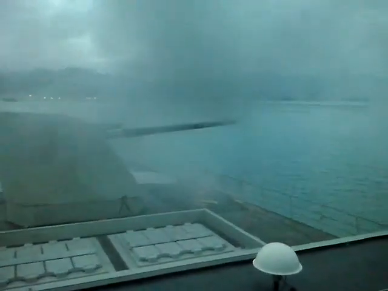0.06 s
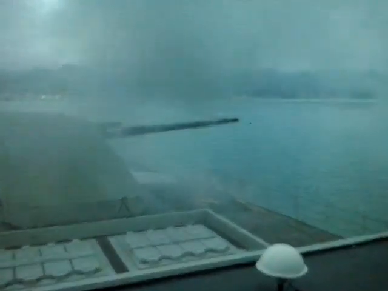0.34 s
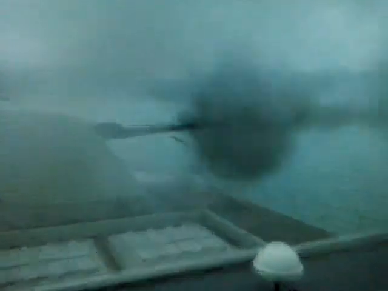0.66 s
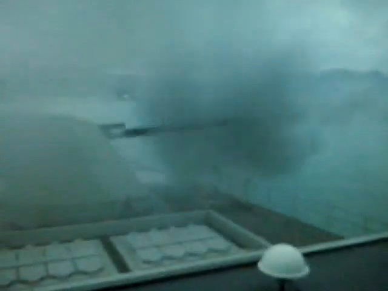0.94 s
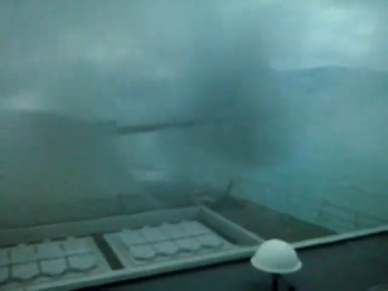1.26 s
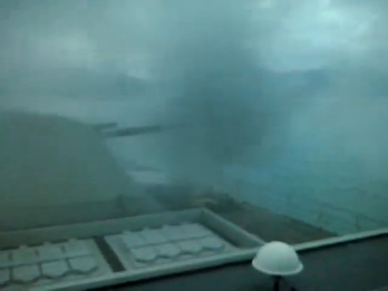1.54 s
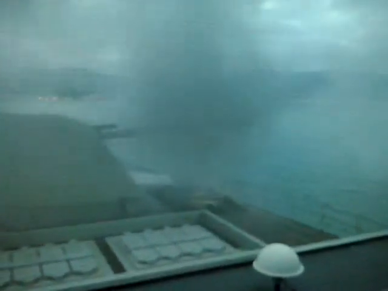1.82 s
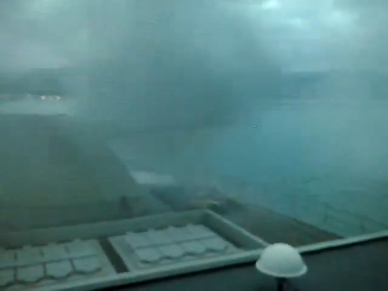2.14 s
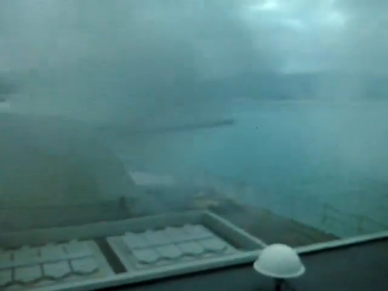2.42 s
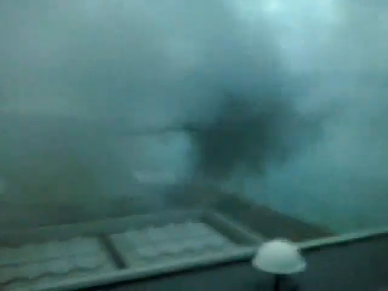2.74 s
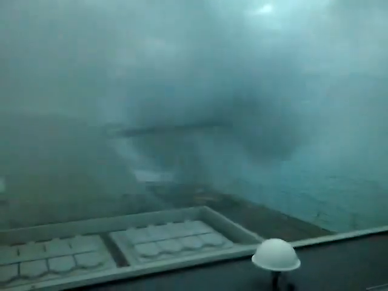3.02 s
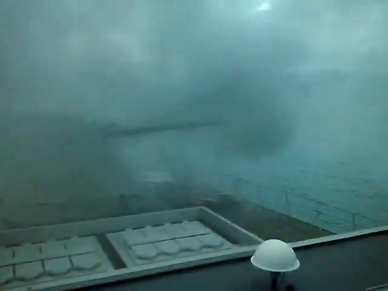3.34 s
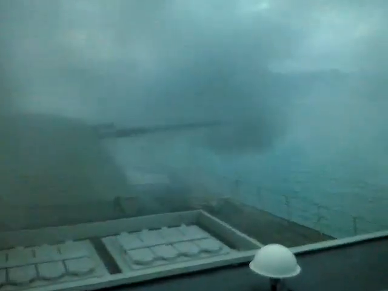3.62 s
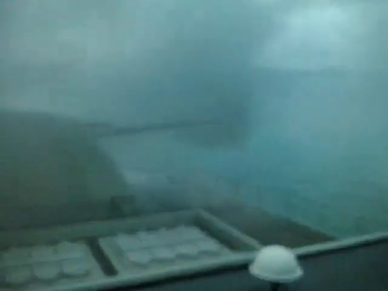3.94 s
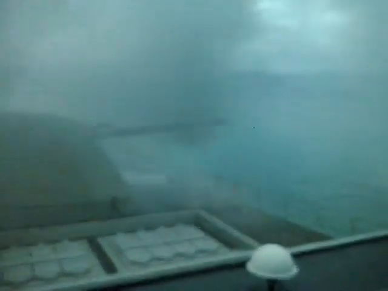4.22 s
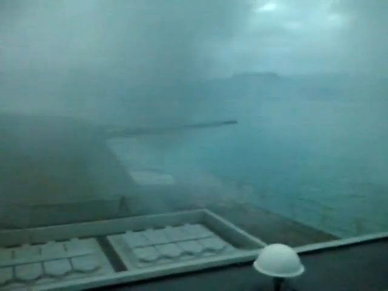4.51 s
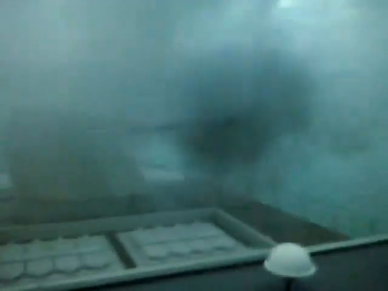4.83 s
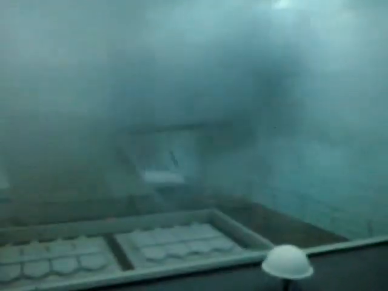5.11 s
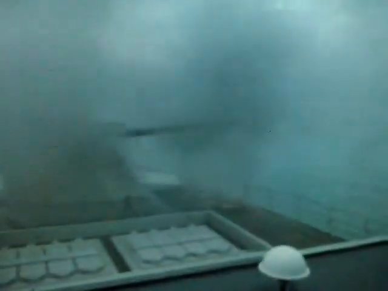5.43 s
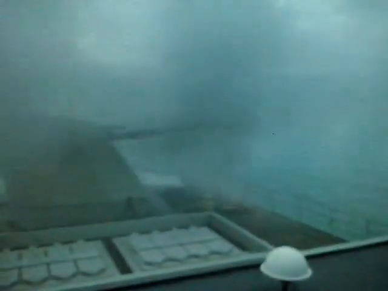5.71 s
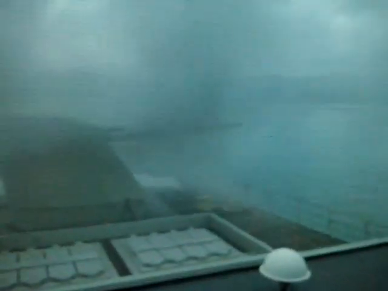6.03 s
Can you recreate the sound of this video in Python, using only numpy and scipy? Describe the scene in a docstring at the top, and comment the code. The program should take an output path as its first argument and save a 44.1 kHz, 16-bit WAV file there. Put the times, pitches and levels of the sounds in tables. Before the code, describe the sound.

A naval deck gun fires three booming, distorted shots over ship rumble, wind and sea, with spent cases clanking on steel.

```python
"""A naval deck gun fires three rounds, two seconds apart, over ship rumble and the hiss of wind and sea.
Each blast overloads the microphone: first a hard slam, then sputtering cracks as the air pressure swings
from one limit to the other. A boom and a roar then roll away over the water. Spent cases clank on the
steel deck, machinery whines, and the background swells with each stroke of the gun's gear."""
import sys
import numpy as np
from scipy import signal
from scipy.fft import rfft, irfft, next_fast_len
from scipy.io import wavfile

SR = 44100
rng = np.random.default_rng(int(sys.argv[2]) if len(sys.argv) > 2 else 0)


def persist_wave(psi):
    """Save psi, clipped to +-1, as 16-bit WAV."""
    counts = np.round(np.clip(psi, -1, 1) * 32767).astype(np.int16)
    wavfile.write(sys.argv[1], SR, np.atleast_2d(counts).T)


N = 276110
TIME = np.arange(N) / SR

# The gun's rounds. Each row: arrival of the blast in seconds, level of its boom and roar in dB.
ROUNDS = [(0.876, 0), (2.888, 0), (4.874, 0.5)]
# The tone colour of each noise. Each row: frequency in Hz, relative level in dB.
RUMBLE_COLOUR = [(20, -25), (35, -22), (55, -8.5), (80, -1.5), (110, -3.5), (145, -4.5), (190, -12.5),
                 (250, -18.5), (320, -33), (600, -49), (1500, -70.5)]
WASH_COLOUR = [(150, -13), (330, -0.5), (450, -1.5), (560, 2), (850, -7), (1150, -5), (1600, -5),
               (2300, -9.5), (3200, -11.5), (4500, -28.5), (7500, -39)]
HISS_COLOUR = [(1000, -22.5), (2500, -8.5), (4000, 2.5), (5200, 0.5), (6500, 1), (7500, -1.5)]
BOOM_COLOUR = [(25, -40.5), (50, -5), (80, 0), (120, 8.5), (170, -2.5), (250, -12.5), (400, -24),
               (800, -48.5)]
ROAR_COLOUR = [(100, -28.5), (300, -5), (600, 0.5), (1000, -3.5), (1550, 3.5), (2300, -4), (4000, -4),
               (6000, -4.5), (7500, -7.5)]
SLAM_COLOUR = [(20, 1.5), (60, -0.5), (130, 3), (250, -3.5), (350, -6), (480, -17), (1200, -23.5),
               (3000, -40), (7500, -69)]
SPUTTER_COLOUR = [(70, 10), (150, 10.5), (330, 10.5), (480, 2.5), (900, -5.5), (1500, 4.5), (2300, -4),
                  (4200, -3.5), (6000, -4.5), (7500, -5)]
HEAVE_COLOUR = [(15, -28), (24, -6.5), (31, -4), (39, -7), (60, -8.5)]
# Ship, wind and sea while the gun is still: the levels of rumble, wash and hiss in dB.
BACKGROUND_DB = (-28, -44, -55.5)
# Strokes of the loading and aiming gear.
# Each row: start in seconds, length in seconds, then the levels of rumble, wash and hiss in dB.
GEAR_STROKES = [ (0.0, 0.17, -20, -37, -44.5), (1.371, 0.32, -24, -37, -46),
                (1.837, 0.074, -23.5, -40, -47.5), (2.11, .1, -24.5, -42.5, -50),
                (2.617, 0.1, -22.5, -42.5, -52), (3.375, 0.38, -26, -44, -49.5),
                (3.793, 0.1, -23.5, -41, -47), (3.979, .12, -16, -35.5, -43.5),
                (4.676, 0.11, -24.5, -44.5, -49), (5.36, .45, -23.5, -43, -49.5),
                (5.98, 0.14, -24, -44.5, -50.5)]
# Tones of the ship's machinery and the gun drive. Each row: pitch in Hz, level in dB.
MACHINE_TONES = [(140, -34.5), (446.8, -56), (565.2, -48), (1077, -58.5), (1244, -61), (1637, -56.5)]
# Spent cases and loading gear hitting steel. Each row: start in seconds, level in dB.
STEEL_HITS = [(0.839, -30.5), (1.512, -33.5), (1.588, -32), (3.444, -37), (3.507, -38.5), (3.992, -39.5),
              (5.432, -37.5), (5.494, -35.5), (5.565, -41.5), (5.79, -40)]
# The notes steel rings with. Each row: pitch in Hz, relative level in dB, seconds to fade by 60 dB.
STEEL_NOTES = [(497, -6, .12), (655, 5, 0.058), (780, 6.5, 0.36), (1054, 12, 0.22), (1290, -6, .12),
               (1530, 11, 0.45), (1450, 17.5, 0.15), (1720, -24, .15), (2130, 0, 0.23), (3250, -19, .12),
               (3880, -12.5, .12), (5720, -31, .1)]
# The last pressure swings, which briefly overload the microphone again.
# Each row: delay in seconds after it first comes free, length in seconds.
LATE_SWINGS = [(0.03, 0.011), (0.051, 0.01), (.066, .003)]

# Seconds after a blast arrives: the slam ends, the swings start, the microphone comes free.
# "Pinned" means pushed to its limit, so that it cannot follow other sounds.
SLAM_S, FIRST_SWING_S, PINNED_S = .07, .0855, .298


def amp(db):
    """Turns decibels into a number to multiply a sound by."""
    return 10 ** (np.asarray(db) / 20)


def unit(x):
    """Scales a signal to an average strength (rms) of 1."""
    return x / np.sqrt(np.mean(x ** 2) + 1e-20)


def noise(colour):
    """Noise of strength 1 with the given tone colour."""
    hz, db = np.transpose(colour)
    size = next_fast_len(N)
    bins = np.fft.rfftfreq(size, 1 / SR) + 1
    shape = amp(np.interp(np.log(bins), np.log(hz), db, left=-np.inf, right=-np.inf))
    return unit(irfft(rfft(rng.standard_normal(size)) * shape, size)[:N])


def drift(per_s):
    """A wandering curve of strength 1 that heads for a new random value per_s times a second."""
    points = rng.standard_normal(4096)
    return unit(np.interp(TIME * per_s, np.arange(len(points)), points))


def ramp(start, length):
    """Rises from 0 to 1 over the given length in seconds."""
    return np.clip((TIME - start) / length, 0, 1)


def low_pass(x, hz):
    """Steeply cuts the treble above hz."""
    return signal.oaconvolve(x, signal.firwin(161, hz, window=("kaiser", 7), fs=SR), "same")


def ship_and_sea(rise_s=0.021, fall_db_per_s=42.5, lumps_db=2, flicker_db=0.76, spurts_db=2):
    """Lumpy rumble, wash and hiss of ship, wind and sea; all swell with each stroke of the gun's gear."""
    gear = np.zeros((3, N))
    for start, length, *levels in GEAR_STROKES:
        swell = ramp(start, rise_s) * amp(-fall_db_per_s * np.maximum(TIME - start - length, 0))
        gear = np.hypot(gear, amp(levels)[:, None] * swell)  # hypot adds the powers of two noises
    gear[2] *= amp(spurts_db * drift(24))  # the gear's hiss comes in spurts
    rumble, wash, hiss = np.hypot(gear, amp(BACKGROUND_DB)[:, None])
    low = rumble * amp(lumps_db * drift(9.4)) * noise(RUMBLE_COLOUR)
    flicker = amp(flicker_db * drift(40))
    return low + flicker * (wash * noise(WASH_COLOUR) + hiss * noise(HISS_COLOUR))


def machinery(waver=0.01068, throb_db=2):
    """The ship's machines and the gun drive hum and whine, wavering a little in pitch and strength."""
    out = np.zeros(N)
    for hz, db in MACHINE_TONES:
        turns = np.cumsum(hz * (1 + waver * drift(45))) / SR
        throb = amp(throb_db * drift(16))
        out += amp(db) * unit(throb * np.sin(2 * np.pi * turns))
    return out


def boom_and_roar(hull_db_per_s=800, boom_hold_s=0.41, boom_db_per_s=172.5, roar_db_per_s=128):
    """Each shot comes through the hull just ahead of its blast, then rolls away over the water."""
    boom, roar = np.zeros((2, N))
    for arrives, db in ROUNDS:
        since = TIME - arrives
        hull_db = hull_db_per_s * since
        boom_fall_db = boom_db_per_s * np.maximum(since - boom_hold_s, 0)
        roar_fall_db = roar_db_per_s * np.maximum(since - PINNED_S, 0)
        boom += amp(db + np.where(since < 0, hull_db - 1.5, -10 - boom_fall_db))
        roar += amp(db + np.where(since < 0, hull_db - 23.5, -14.5 - roar_fall_db))
    roar *= noise(ROAR_COLOUR) * amp(drift(130))  # flutters by about 1 dB
    for arrives, _ in ROUNDS:
        for delay, length in LATE_SWINGS:
            from_swing = TIME - arrives - PINNED_S - delay
            roar *= 1 - np.exp(-(2 * from_swing / length) ** 4)  # chops a short gap
    return boom * noise(BOOM_COLOUR) + roar


def clanks(rattle_fade_s=0.13, ring_db=2):
    """Cases and gear hit steel: a short rattle, and a ring with a new mix of notes each time."""
    hz, note_db, fade_s = np.transpose(STEEL_NOTES)[:, :, None]
    out, rattle = np.zeros(N), noise(ROAR_COLOUR)
    for start, db in STEEL_HITS:
        first = round(start * SR)
        at = np.arange(first, min(first + SR // 2, N))
        t = TIME[:len(at)]
        strength, detune = rng.standard_normal((len(hz), 2)).T[:, :, None]
        waves = np.sin(2 * np.pi * hz * (1 + .01 * detune) * t)
        notes = amp(note_db - 60 * t / fade_s) * strength * waves
        ring = notes.sum(0) / np.linalg.norm(amp(note_db))
        out[at] += amp(db) * (amp(ring_db) * ring + amp(-60 * t / rattle_fade_s) * rattle[at])
    return out


def shock_cracks(count=9, front_s=0.00404, front_db=-5.5, half_length_s=0.0012):
    """The shock front cracks first, then the slam tears at uneven moments."""
    place, louder = rng.uniform(-0.993, 1, (count, 2)).T
    tear_s = front_s + (FIRST_SWING_S - front_s) * (np.arange(1, count + 1) + place / 2) / (count + 1)
    tear_db = -12 + 4 * louder
    half_lengths = np.full(count + 1, half_length_s)
    return np.column_stack([np.r_[front_s, tear_s], half_lengths, np.r_[front_db, tear_db]])


def swing_cracks(count=13, gap_s=.0141, slowing_s=.00036, jitter_s=0.00062, rebound_chance=.2):
    """The pressure swings to and fro, ever slower, and cracks as it crosses the microphone's range."""
    step = np.arange(2 * count - 1) / 2
    main = step % 1 == 0  # the half steps in between are possible rebounds
    late, longer, louder = rng.standard_normal((len(step), 3)).T
    luck, skew = rng.random((len(step), 2)).T
    step += ~main * (skew - .5) / 2
    delay = FIRST_SWING_S + gap_s * step + slowing_s * step ** 2 / 2
    crest = np.exp(-((delay - 0.218) / 0.026) ** 2)  # cracks are longer and louder near 0.218 s
    half_length = .0019 * (1 + 1.36 * crest) * np.exp(0.22 * longer)
    db = np.where(main, -12.5, -13) + 4.5 * crest + 3 * louder
    # Rebounds come by chance at first, then every time for a short spell, then stop.
    rebounds = (delay < .207) & ((delay > .174) | (luck < rebound_chance))
    return np.column_stack([delay + jitter_s * late, half_length, db])[main | rebounds]


def bass_cut(x, corner_hz=74):
    """The microphone's steep bass cut turns every jump in pressure into a short, falling thud."""
    return signal.sosfilt(signal.butter(6, corner_hz, "high", fs=SR, output="sos"), x)


def blasts(limit_db=1.5, punch_db=9, crack_db=4, heave_db=-5.5, fray_db=-29, fray_s=0.0065):
    """Each blast slams the microphone between its limits, then pins it with swings that crack."""
    slam = np.tanh(15 * noise(SLAM_COLOUR))  # squashed until its edges are square
    sputter = noise(SPUTTER_COLOUR) * amp(1.5 * drift(700))
    pressure, early, deep = np.zeros((3, N))
    for arrives, _ in ROUNDS:
        slam_ends, comes_free = arrives + SLAM_S, arrives + PINNED_S
        span = (TIME > arrives) & (TIME < comes_free + .02)
        # Each row is a crack: delay in seconds, half its length in seconds, relative level in dB.
        cracks = np.vstack([shock_cracks(), swing_cracks()])
        delay, half_length, db = cracks.T[:, :, None]
        since = TIME[span] - arrives - delay
        # A crack is a quick flip from limit to limit; noise breaks through and frays out after it.
        flips = np.sin(np.pi / 2 * np.clip(since / (0.61 * half_length), -1, 1))
        swing = flips.prod(0)
        opening = np.cos(np.pi / 2 * np.clip(since / half_length, -1, 1)) ** 2
        opening += amp(fray_db) * (since > 0) * np.exp(-abs(since) / fray_s)
        bursts = (opening * amp(crack_db + db)).sum(0) * sputter[span]
        handover = ramp(slam_ends, 0.0032)[span]
        slam_then_swing = (1 - handover) * slam[span] * abs(swing) + handover * swing
        held = (ramp(arrives, 0.005) - ramp(comes_free, 0.0076))[span]
        pressure[span] = held * (amp(limit_db) * slam_then_swing + bursts)
        early += ramp(arrives, 0.008) - ramp(slam_ends - .03, 0.12)
        deep += ramp(arrives + 0.01, 0.02) - ramp(slam_ends, 0.07)
    punch = 1 + (amp(punch_db) - 1) * early  # everything is louder at the start of a blast, easing off over about 0.15 s
    heave = amp(heave_db) * deep * noise(HEAVE_COLOUR)  # a deep push that gets past the bass cut
    return punch * (bass_cut(pressure) + heave)


def choke(leak_db=-51):
    """A volume curve: 1 while the microphone can follow the air, near 0 while a blast pins it."""
    pinned = sum(ramp(arrives, 0.0034) - ramp(arrives + PINNED_S - .002, 0.001) for arrives, _ in ROUNDS)
    return 1 - (1 - amp(leak_db)) * np.clip(pinned, 0, 1)


def scene():
    """Mixes the sounds in mono; each blast chokes all the others while it pins the microphone."""
    return (blasts() + choke() * (boom_and_roar() + ship_and_sea() + machinery() + clanks()))[None]


def record(dry, mic_hz=7550, ceiling=.705, treble_db=-9.5, highest_hz=16500):
    """The microphone loses the high treble and clips loud peaks; the fizz this adds is softened."""
    clipped = np.clip(low_pass(dry[0], mic_hz), -ceiling, ceiling)
    body = signal.filtfilt(*signal.butter(4, 8300, fs=SR), clipped)
    fizz = clipped - body
    return low_pass(body + amp(treble_db) * fizz, highest_hz)[None]


dry = scene()
out = record(dry)
persist_wave(out)
```